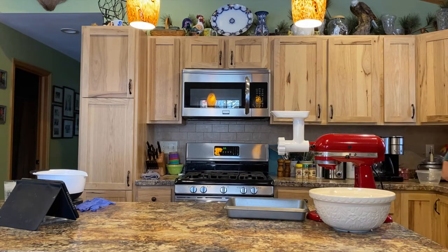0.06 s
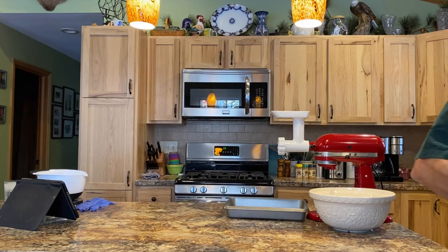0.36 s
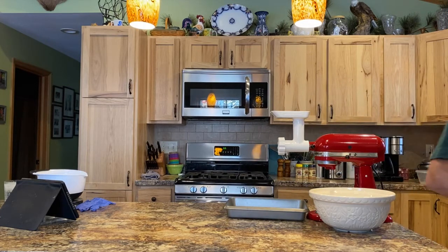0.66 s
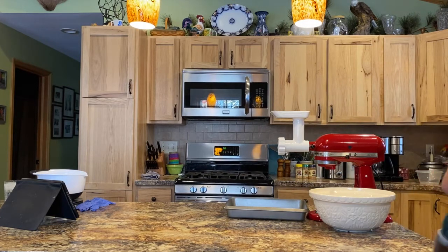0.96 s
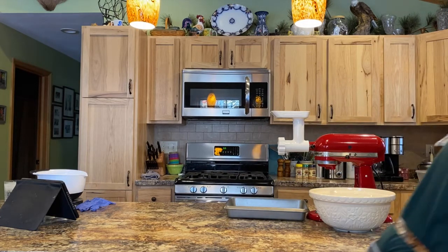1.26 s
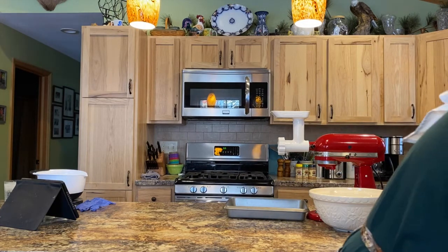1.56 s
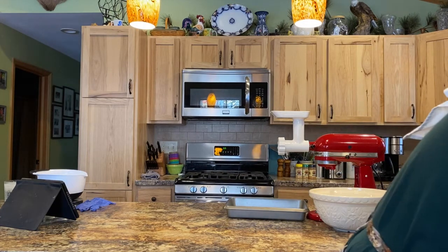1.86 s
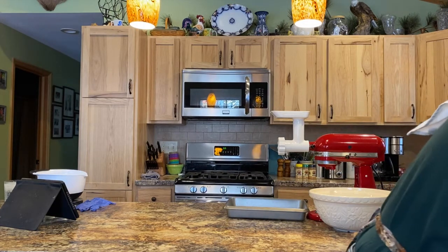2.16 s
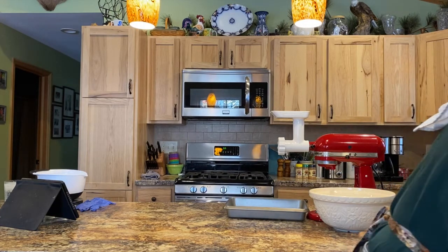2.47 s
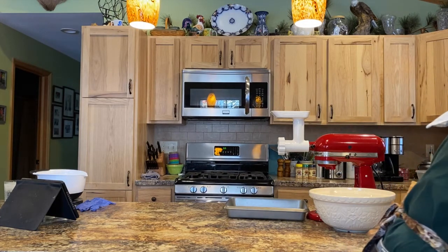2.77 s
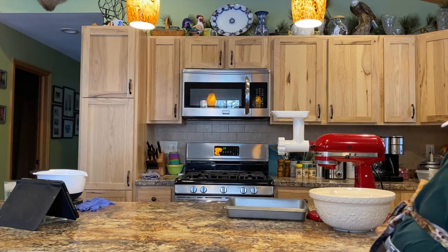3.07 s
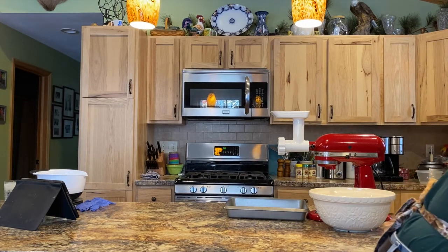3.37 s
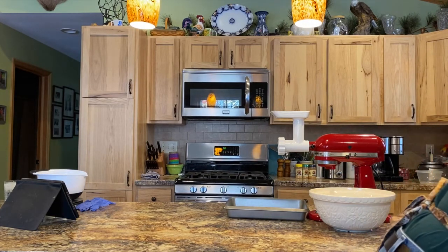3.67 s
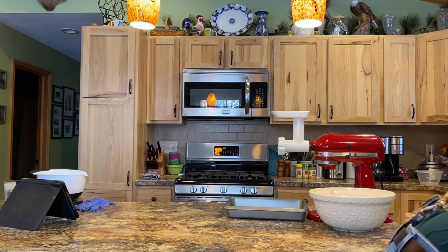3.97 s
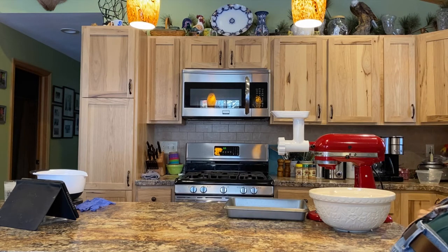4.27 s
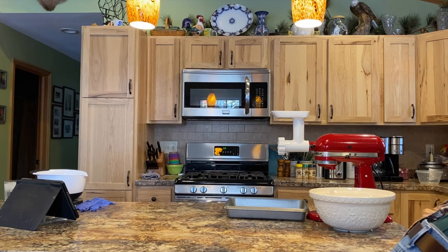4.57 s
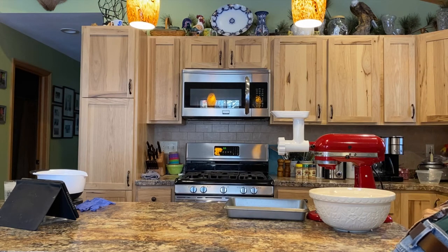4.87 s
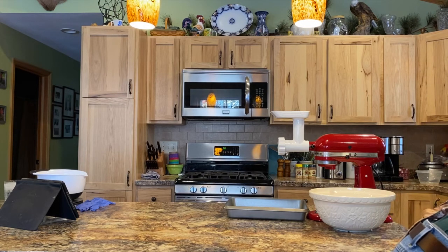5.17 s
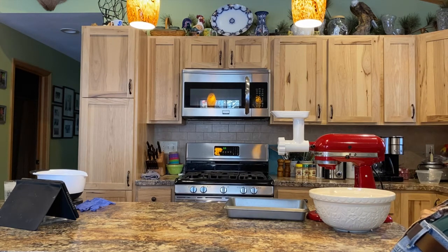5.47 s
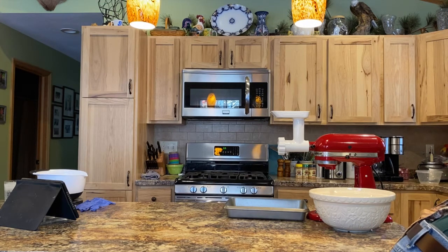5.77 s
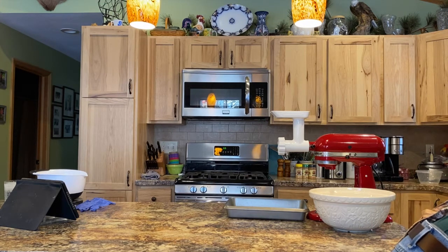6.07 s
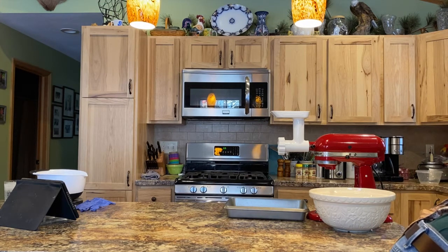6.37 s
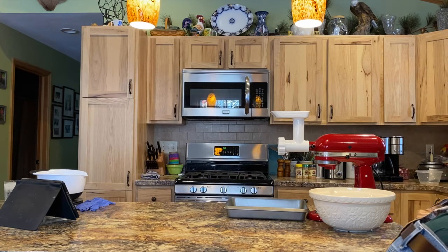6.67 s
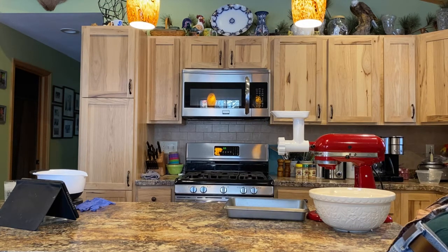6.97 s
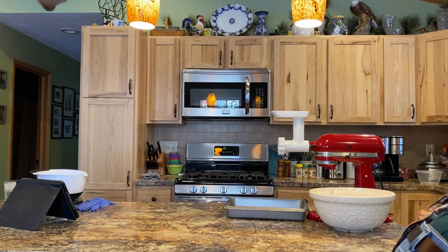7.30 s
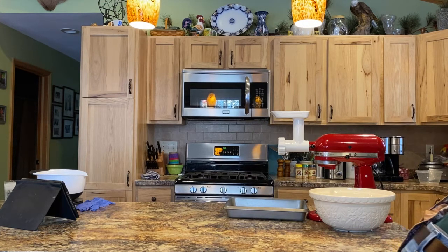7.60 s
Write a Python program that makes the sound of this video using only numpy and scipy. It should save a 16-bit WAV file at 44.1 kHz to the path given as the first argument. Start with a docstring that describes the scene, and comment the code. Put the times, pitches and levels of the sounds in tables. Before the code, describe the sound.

A small dry tap sounds close by at the start, followed by soft brushes of clothing. From about 1 second a freezer drawer rumbles and scrapes open on its rollers, bumping its stops around 1.7 and 2.1 seconds, and its wire basket jingles near 2 and 2.4 seconds. At 3.2 seconds a single hollow thump rings a door panel. From about 4.2 seconds bags of meat crinkle, click and knock against plastic bins, loudest near 6 seconds, where the load settles in a quick tumble. Two faint squeaks follow. From about 6.7 seconds the drawer rolls back with a wire rattle and a few knocks, then thuds shut at 7.7 seconds, shaking the cabinet. Quiet fan noise and electrical hum continue throughout, and the hard kitchen surfaces give each contact a short echo.

```python
"""A dry tap and a brush of clothes, then a freezer drawer rumbles open on its rollers, bumps its stops
and jingles its wire basket. A thump rings the hollow door panel. Bags of meat crinkle and knock
against the plastic bins; the drawer rolls back and thuds shut, shaking the cabinet.
Fan noise and hum run underneath, and the hard kitchen cabinets echo each contact."""
import sys
import numpy as np
from scipy import signal
from scipy.fft import rfft, irfft
from scipy.io import wavfile
from scipy.ndimage import uniform_filter1d

SR = 44100
rng = np.random.default_rng(int(sys.argv[2]) if len(sys.argv) > 2 else 0)


def master_out(mix):
    """Clip the mix to full scale and print it as 16-bit PCM to the path in sys.argv[1]."""
    frames = np.transpose(np.atleast_2d(mix))
    ceiling = np.clip(frames, -1, 1)
    pcm = np.round(ceiling * 32767).astype(np.int16)
    wavfile.write(sys.argv[1], SR, pcm)


N = 345744
TIME = np.arange(N) / SR
AGE = TIME[:SR // 2]  # s since a blow

# Levels are ahead of mix gains; a mode's t60 is ahead of ring()'s damping.
# drawer speed as loudness, out and in: t/s, level/dB
ROLL_OUT = [(.92, -63.5), (1.05, -46.5), (1.16, -61), (1.34, -45), (1.65, -40), (1.85, -42.5), (2.2, -52),
            (2.5, -54), (2.7, -68.5)]
ROLL_IN = [(6.68, -70), (7.05, -48.5), (7.28, -52), (7.45, -39.5), (7.62, -51.5), (7.75, -31.5),
           (7.84, -41)]
# slides unloaded: start/s, end/s
COASTS = [(1.78, 2.1), (6.85, 7.32)]
# roller and slide spectra: f/Hz, level/dB
RUMBLE_SPECTRUM = [(30, -38), (80, 6), (150, 0.5), (230, 3), (310, 6), (420, -1.5), (600, -2.5),
                   (1000, -16.5), (2000, -42), (4400, -68)]
SCRAPE_SPECTRUM = [(250, -22), (650, 2), (1100, -2.5), (1800, -5.5), (2600, -13), (4500, -17),
                   (9000, -24.5), (16000, -27)]
# drawer on its stops: t/s, level/dB, hardness/(dB/oct), weight/dB
STOPS = [(1.6619, -39, -0.5, -9), (1.6917, -39.5, .5, 1), (2.14, -38.5, -0.2, 0), (7.7135, -44, 2, 14.5),
         (7.7571, -46, 1.5, 8.5)]
# packs on bins, then the bin itself sliding and rattling: t/s, level/dB, hardness/(dB/oct), weight/dB, hollow
# f/Hz
KNOCKS = [(4.206, -37, -3.5, -7, 210), (4.819, -32.5, -0.3, -9, 211), (4.843, -37, -5, 4, 185),
          (5.113, -36.5, 1.9, -10, 233), (5.141, -33.5, -0.8, -1.5, 185), (5.803, -41, 1, 3.5, 225),
          (5.884, -32.5, -3, 0, 220), (5.965, -27.5, 0, -15, 300), (6.0049, -25, 3, 0, 342),
          (7.3246, -32, .2, 3, 410), (7.413, -35, 0.8, 3, 367), (7.661, -38, 2.5, 4.5, 307)]
# plastic clicks: t/s, level/dB, hardness/(dB/oct)
SNAPS = [(2.113, -67, 2.5), (2.3044, -66.5, 3.5), (2.7154, -64.5, -2), (3.4732, -60.5, -1.5),
         (4.3428, -62.5, -2), (4.4866, -64, -1), (4.542, -61.5, -1), (4.6462, -52, 1), (4.7676, -48.5, 2),
         (4.796, -49, -1.5), (4.9149, -49, -3), (5.0704, -54.5, 4.5), (5.3107, -57.5, 0), (5.3554, -49, 2),
         (5.4142, -50, 3.5), (5.4324, -52.5, -0.5), (5.5534, -56, -1.5), (5.6333, -50.5, -.5),
         (5.6842, -58, -3.5), (5.8188, -51.5, 5), (5.9328, -45.5, 3), (6.17, -57, -5.5), (6.444, -72, 0.5),
         (6.4652, -59, -1), (6.578, -75, 2), (6.8285, -62, 1), (6.9722, -59.5, 2.6), (7.4605, -48.5, 0),
         (7.4994, -54, 3.5)]
# basket jingles: t/s, wire level/dB, bin level/dB
JINGLES = [(1.967, -40, -44), (2.367, -30, -33), (2.531, -59, -46), (2.723, -59, -53), (2.857, -58, -49),
           (7.303, -40.5, -42.5)]
# roller bumps and footfalls: t/s, level/dB
BUMPS = [(1.026, -45), (1.175, -40), (1.311, -40), (1.402, -47), (1.745, -26), (1.799, -40), (1.934, -36),
         (2.251, -37.5), (6.789, -43.5), (6.87, -42), (6.98, -48), (7.331, -46)]
# rubbed plastic and rail: t/s, length/s, first f/Hz, last f/Hz, level/dB
SQUEAKS = [(1.308, 0.037, 4580, 3310, -59.5), (2.714, 0.042, 4110, 4040, -71),
           (2.857, 0.03, 4380, 4230, -74), (6.323, 0.073, 958, 923, -61), (6.726, 0.049, 926, 870, -63.5)]
# bag grips and clothes brushes: t/s, length/s, level/dB
BAG_STROKES = [(4.25, 0.18, -61.5), (4.52, 0.28, -62.5), (4.7, 0.33, -53.5), (5.04, 0.2, -43),
               (5.22, 0.41, -52.5), (5.52, 0.15, -50), (5.68, 0.27, -56), (5.775, 0.34, -43),
               (6.08, 0.091, -61)]
CLOTH_STROKES = [(.08, 0.091, -51), (.205, .12, -61), (.445, 0.15, -52), (.6, 0.42, -67.5),
                 (.93, .11, -56.5), (1.08, 0.25, -60), (1.43, 0.23, -52.5), (3.8, 0.31, -72),
                 (6.94, 0.53, -67.5)]
# resonances: f/Hz, level/dB, t60/s
CABINET_MODES = [(66.3, -6, 0.52), (80, 2.5, 0.46), (96.5, 1, 0.68), (123.2, -0.5, 0.5)]
BIN_MODES = [(154, -5, 0.38), (202.7, 1.5, 0.28), (238, -9, 0.22), (308.4, 1.5, 0.39), (400, -7, 0.55),
             (540, -0.5, 0.44), (685, 5, .2), (724, -10, 0.66), (810, 6, 0.37), (990, -41, 0.33),
             (1183, 2.5, 0.11), (1480, -17, 0.19)]
BASKET_MODES = [(3880, 4, 0.14), (4150, 7, 0.22), (4440, -7, .12), (5100, 0, 0.2), (5600, 6, .09)]
DOOR_MODES = [(68.7, 3.5, 0.26), (83.1, -1, 0.32), (154.6, 7.5, 0.14), (200.3, -1.5, 0.22),
              (226.5, -2, 0.18), (300, -18, 0.28), (350, -22, 0.15), (437, -3.5, 0.24), (499, -2, 0.073),
              (755, -28, .28), (1000, -22, 0.37), (1186, -22, 0.38), (1453, -23, 0.24), (1630, -16.5, 0.24)]
TAP_MODES = [(117, -15, 0.061), (203, -10.5, 0.082), (283, -12.5, 0.064), (604, -1.5, 0.0084),
             (876, -5.5, 0.019), (2170, 2.5, 0.006), (2850, 0.5, 0.0094), (3550, 2, 0.0053),
             (8700, -15, 0.0075)]
# door slap, bag, cloth and fan spectra: f/Hz, level/dB
SLAP_SPECTRUM = [(60, -24), (200, -1.5), (450, -8), (620, -12.5), (1600, -16.5), (2600, -25), (5000, -29),
                 (16000, -53)]
BAG_SPECTRUM = [(80, -12), (180, 16.5), (350, 6.5), (700, 6.5), (1500, 2.5), (3000, -2), (6000, -6),
                (9000, -6), (12000, -7.5), (16000, -16)]
CLOTH_SPECTRUM = [(180, -54), (300, -11), (360, -20), (440, -6), (614, -13), (900, -4.5), (1750, -8.5),
                  (8940, -14), (16000, -20.5)]
FAN_SPECTRUM = [(25, -31), (64, -8), (100, -4), (190, -6), (260, -7.5), (400, -14.5), (575, -15),
                (750, -18.5), (1200, -24.5), (2500, -29.5), (4800, -33), (10000, -37.5),
                (14000, -39), (16000, -57)]
# appliance tones: f/Hz, level/dB
HUM_TONES = [(75.4, -71.5), (183.0, -67), (274.5, -71.5), (581.4, -76.5), (4753, -81), (8527, -96),
             (10137, -92)]
# kitchen decay: f/Hz, t60/s
ROOM_DECAY = [(80, 0.71), (300, 0.44), (1000, 0.52), (4000, 0.54), (8000, 0.43), (14000, 0.26)]

# parts of a knock: thud, hollow, body, clack, crack
STOP_MIX_DB = [10, 2, 0, -7.5, -0.5]
KNOCK_MIX_DB = [-8, -2, -0.5, -7, -14]
TUMBLE_MIX_DB = [-3.5, 3.5, 0, -22, -12]
HARDNESS_OCT = np.array([0, 0, 0, 1.7, 3.2])
WEIGHT_SHARE = np.array([1, 1, 0, 0, 0])
# parts of a snap: body, clack, crack
SNAP_MIX_DB, SNAP_OCT = np.array([-1, 0.5, -0.5]), np.array([-2.5, 0, 1.8])
THUMP_S = 3.215


def drawer(coast_db=-9.5, ease_s=0.15):
    """Rollers on uneven rails shake the cabinet; slides scrape, less when coasting. All follow speed."""
    rumble = coloured(grains(N, 2500, 0.44), RUMBLE_SPECTRUM) * amp(1.2 * drift(25))
    scrape = coloured(grains(N, 9000, 3.8), SCRAPE_SPECTRUM) * amp(0.15 * drift(33))
    drone = unit_rms(through(grains(N, 800, 1.5), ring(CABINET_MODES, damping=1.6)))
    speed = gain_curve(ROLL_OUT) + gain_curve(ROLL_IN)
    coasting = sum(np.clip(np.minimum(TIME - start, end - TIME) / ease_s + 0.5, 0, 1)
                   for start, end in COASTS)
    return speed * (amp(1) * rumble + amp(-5 + coast_db * coasting) * scrape + amp(-10.5) * drone)


def knock(db, hardness, weight_db, mix_db, chatter_s, hollow_hz):
    """A blow chatters on plastic; low parts answer later. Hardness lifts the highs, weight the lows."""
    parts_db = db + np.array(mix_db) + hardness * HARDNESS_OCT + weight_db * WEIGHT_SHARE
    thud_db, hollow_db, body_db, clack_db, crack_db = parts_db
    decay_s = chatter_s * 2 ** (-0.066 * max(hardness, 0))
    edges_hz = hollow_hz / 1.7, hollow_hz * 1.455  # where the bin is hit picks the modes
    clack_hz = 2690 * (hollow_hz / 290) ** 0.33
    shell = unit_rms(band(chatter(1.02 * decay_s, rise_s=0.0014), *edges_hz))
    modes = unit_rms(band(ring(BIN_MODES, damping=1.63, swell_cycles=0.96), *edges_hz))
    hollow = blow(shell + modes, hollow_db)
    contact = band(chatter(0.93 * decay_s, rise_s=0.0017), 476, 1650)
    bin_ring = through(contact, ring(BIN_MODES, damping=2.5))
    body = blow(unit_rms(contact) + amp(-7.5) * unit_rms(bin_ring), body_db)
    clack = blow(band(chatter(decay_s, rise_s=0.0013), clack_hz / 1.53, clack_hz * 1.61), clack_db)
    crack = blow(band(chatter(0.81 * decay_s, rise_s=0.00091), 4000, 13000), crack_db)
    return thud(thud_db) + hollow + body + clack + crack


def thud(db):
    """The heavy cabinet swings low, slow to start."""
    return blow(ring(CABINET_MODES, damping=1.54, swell_cycles=1.1), db)


def stops():
    """The drawer hits its stops and shakes the cabinet."""
    return place((t, knock(db, hardness, weight_db, STOP_MIX_DB, chatter_s=0.022, hollow_hz=274))
                 for t, db, hardness, weight_db in STOPS)


def bin_knocks():
    """Packs of meat hit the bins; later the bin itself slides and rattles."""
    return place((t, knock(db, hardness, weight_db, KNOCK_MIX_DB, chatter_s=0.016, hollow_hz=hz))
                 for t, db, hardness, weight_db, hz in KNOCKS)


def tumble(start_s=6.0216, gap_s=0.032, count=5):
    """The load settles in even bounces, each crisper, fading ever faster."""
    out = np.zeros(N)
    for k in range(count):
        db = -31.5 - 13 * (k / (count - 1)) ** 3
        bounce = knock(db, 0.6 * k, 0, TUMBLE_MIX_DB, chatter_s=0.018, hollow_hz=308)
        add(out, start_s + k * gap_s, bounce)
    return out


def door_slap():
    """Contact of the thump on the door: sharp tick, dull slap."""
    tick = blow(band(chatter(0.004, first=1.5), 3500, 12500), -47)
    slap = coloured(chatter(0.019, rise_s=0.0022), SLAP_SPECTRUM) * np.exp(-AGE / 0.1)
    return place([(THUMP_S, tick), (THUMP_S + 0.001, blow(slap, -33.5))])


def door_panel():
    """The hollow panel rings after the thump; low modes swell last."""
    return place([(THUMP_S, blow(ring(DOOR_MODES, damping=0.79, swell_cycles=3), -26))])


def basket():
    """Wires rattle together and shake the bin below."""
    out = np.zeros(N)
    for t, wire_db, bin_db in JINGLES:
        rattle = band(chatter(0.0093, rise_s=0.00091), 4300, 5400, order=1)
        wires = through(rattle, ring(BASKET_MODES))
        shake = band(chatter(0.024, rise_s=0.0018), 260, 870, order=1)
        add(out, t, blow(wires, wire_db - 17) + blow(rattle, wire_db - 15.5) + blow(shake, bin_db - 6.5))
    return out


def bumps():
    """Rollers and footfalls jolt the cabinet softly."""
    return place((t, thud(db - 4.5)) for t, db in BUMPS)


def bags():
    """Handled bags crackle in clumps."""
    crackles = grains(N, 1600, 3.5) * amp(drift(50))
    return coloured(crackles, BAG_SPECTRUM) * strokes(BAG_STROKES)


def snaps(chatter_s=0.0055):
    """Plastic clicks, too light to move the cabinet."""
    out = np.zeros(N)
    for t, db, hardness in SNAPS:
        body_db, clack_db, crack_db = db + SNAP_MIX_DB + hardness * SNAP_OCT
        body = blow(band(chatter(2.3 * chatter_s), 174, 890), body_db)
        clack = blow(band(chatter(chatter_s), 1400, 3370), clack_db)
        crack = blow(band(chatter(1.9 * chatter_s, first=0.92), 4500, 13000), crack_db)
        add(out, t, body + clack + crack)
    return out


def tap(start_s=0.0882):
    """A small hard object, tapped nearby, rings briefly."""
    return place([(start_s, blow(ring(TAP_MODES), -40))])


def squeaks():
    """Stick-slip on plastic and rail: brief, unsteady tones."""
    out = np.zeros(N)
    for t, length_s, first_hz, last_hz, db in SQUEAKS:
        size = int(length_s * SR)
        hz = np.linspace(first_hz, last_hz, size) * (1 + 0.015 * drift(280)[:size])
        tone = np.sqrt(2) * np.sin(2 * np.pi * np.cumsum(hz) / SR)
        add(out, t, amp(db) * tone * signal.windows.tukey(size))
    return out


def clothes():
    """Cloth brushes past with a smooth hiss."""
    return coloured(grains(N, 30000, 1.2), CLOTH_SPECTRUM) * strokes(CLOTH_STROKES)


def appliance(waver_rad=0.57):
    """Fan noise, wavering hum and thin electrical whines."""
    hum = sum(amp(db) * np.sqrt(2) * np.sin(2 * np.pi * hz * TIME + waver_rad * drift(7))
              for hz, db in HUM_TONES)
    fan = coloured(rng.standard_normal(N), FAN_SPECTRUM) * amp(0.77 * drift(3))
    return amp(-60.05) * fan + amp(-0.5) * hum


def kitchen(x, count=5):
    """Diffuse echo: the input cycles quickly through random room responses so no pitch rings out."""
    turn = (np.arange(N) // 400) % count
    shares = [np.sqrt(np.abs(uniform_filter1d(1. * (turn == k), size=200))) for k in range(count)]
    echoes = sum(through(x * share, room_response()) for share in shares)
    return band(echoes, 154, 15800, order=1)


def room_response(early_db=-4, tail_db=-3):
    """Quick returns off counter and cabinets; a tail that dies band by band."""
    returns = grains(SR, 9000, 0.8) * np.clip((TIME[:SR] - 0.004) / 0.0033, 0, 1)
    hz, t, spectra = signal.stft(returns, SR, nperseg=256)
    decay = amp(-60 * t / log_interp(ROOM_DECAY, hz)[:, None])
    tail = signal.istft(spectra * decay, SR, nperseg=256)[1][:SR]
    early = grains(SR, 2500, 0.23) * np.exp(-TIME[:SR] / 0.011) * (TIME[:SR] > 0.002)
    return amp(early_db) * early / np.linalg.norm(early) + amp(tail_db) * tail / np.linalg.norm(tail)


def grains(count, per_s, spread_db):
    """Tiny random contacts of unequal size."""
    size = amp(spread_db * np.minimum(rng.exponential(1, count), 4))
    return rng.standard_normal(count) * size * (rng.random(count) < per_s / SR)


def chatter(decay_s, rise_s=0.00024, first=0.21):
    """One hard contact, then a dying burst of smaller ones."""
    envelope = np.exp(-AGE / decay_s) + first * np.exp(-AGE / 0.00099)
    return grains(len(AGE), 16000, 1.85) * envelope * (1 - np.exp(-AGE / rise_s))


def ring(modes, damping=1, swell_cycles=0):
    """Free modal decay; heavy parts take some cycles to swell."""
    out = np.zeros(len(AGE))
    for k, (hz, db, t60_s) in enumerate(modes):
        decay = amp(db - 60 * AGE * damping / t60_s)
        swell = 1 - np.exp(-(AGE * hz / (swell_cycles + 1e-9)) ** 2)
        out += (-1) ** k * decay * swell * np.sin(2 * np.pi * hz * AGE)
    return out


def strokes(rows, rise_share=0.25, fall_share=0.49):
    """Gain of hand or arm moves: swell, hold, die."""
    gain = np.zeros(N)
    for t, length_s, db in rows:
        progress = (TIME - t) / length_s
        gain += amp(db) * np.clip(np.minimum(progress / rise_share, (1 - progress) / fall_share), 0, 1)
    return gain


def gain_curve(points):
    """Smoothed gain, silent outside its span."""
    t, db = np.transpose(points)
    return uniform_filter1d(amp(np.interp(TIME, t, db, left=-120, right=-120)), 400)


def drift(rate_hz):
    """Noise below rate_hz, rms 1."""
    return unit_rms(irfft(rfft(rng.standard_normal(N)) * (np.fft.rfftfreq(N, 1 / SR) < rate_hz), N))


def coloured(x, spectrum):
    """Spectral shaping, rms 1."""
    gain = amp(log_interp(spectrum, np.fft.rfftfreq(len(x), 1 / SR)))
    return unit_rms(irfft(rfft(x) * gain, len(x)))


def log_interp(points, hz):
    """Table lookup over log frequency."""
    f, value = np.transpose(points)
    return np.interp(np.log(hz + 1), np.log(f + 1), value)


def band(x, lo_hz, hi_hz, order=2):
    """Causal band-pass."""
    return signal.sosfilt(signal.butter(order, [lo_hz, hi_hz], "band", fs=SR, output="sos"), x)


def through(x, response):
    """Convolution, length kept."""
    return signal.fftconvolve(x, response)[:len(x)]


def amp(db):
    """dB to gain."""
    return 10 ** (np.asarray(db) / 20)


def unit_rms(x):
    """Scale to rms 1."""
    return x / np.sqrt(np.mean(x ** 2) + 1e-20)


def blow(x, db):
    """Scale to the energy of 20 ms at this level."""
    return amp(db) * x * np.sqrt(0.02 * SR / (np.sum(x ** 2) + 1e-20))


def add(mix, start_s, sound):
    """Mix in at start_s."""
    part = mix[round(start_s * SR):][:len(sound)]
    part += sound[:len(part)]


def place(events):
    """Track from (t/s, sound) pairs."""
    out = np.zeros(N)
    for t, sound in events:
        add(out, t, sound)
    return out


def scene():
    """Contacts plus their echoes over the hum; tap and door panel are drier."""
    contacts = bin_knocks() + stops() + tumble() + snaps() + basket() + squeaks() + door_slap() + bumps()
    far = amp(-1.5) * (contacts + drawer() + clothes() + bags())
    near, panel = tap(), door_panel()
    echoes = kitchen(far + amp(-2) * near + amp(-7.5) * panel)
    return (far + near + panel + echoes + appliance())[None]


def record(dry, cutoff_hz=16200):
    """Steep low-pass."""
    lowpass = signal.firwin(767, cutoff_hz, window=("kaiser", 9), fs=SR)
    return signal.oaconvolve(dry, lowpass[None], "same")


dry = scene()
out = record(dry)
master_out(out)
```